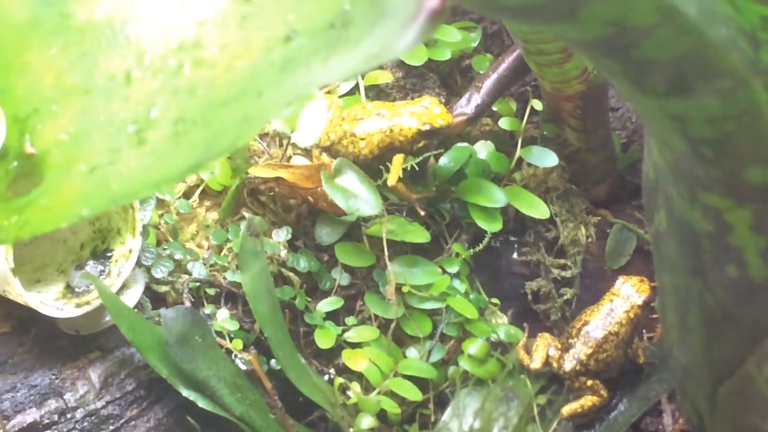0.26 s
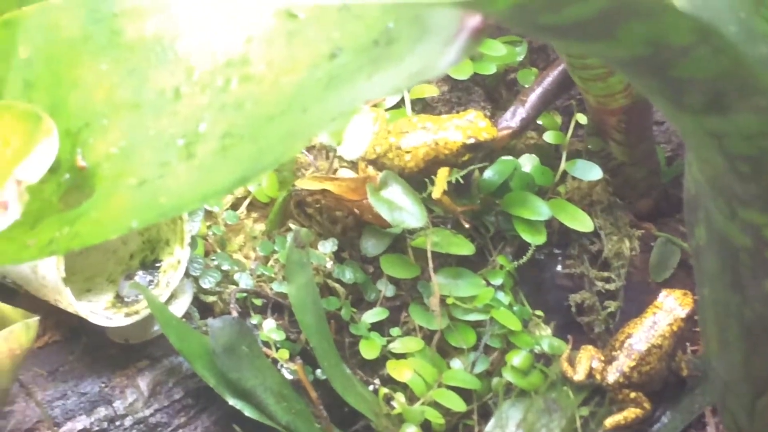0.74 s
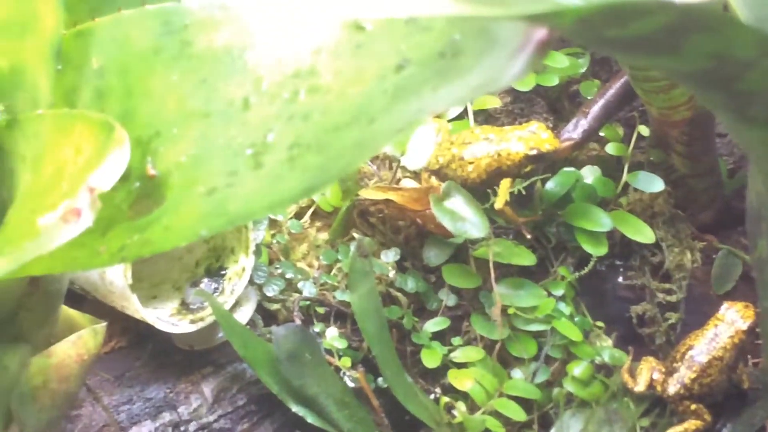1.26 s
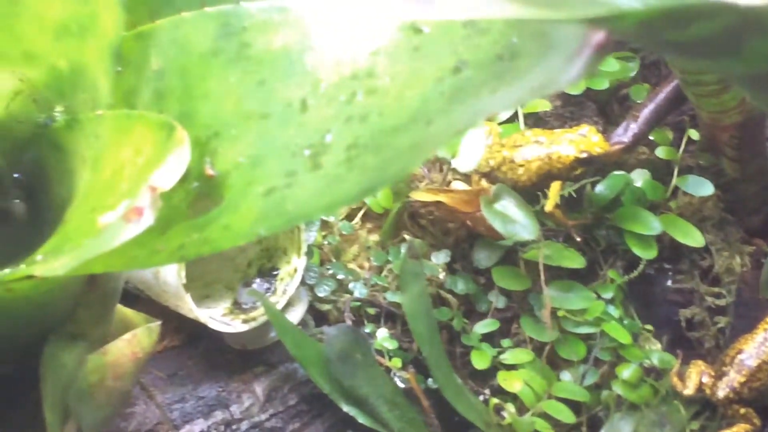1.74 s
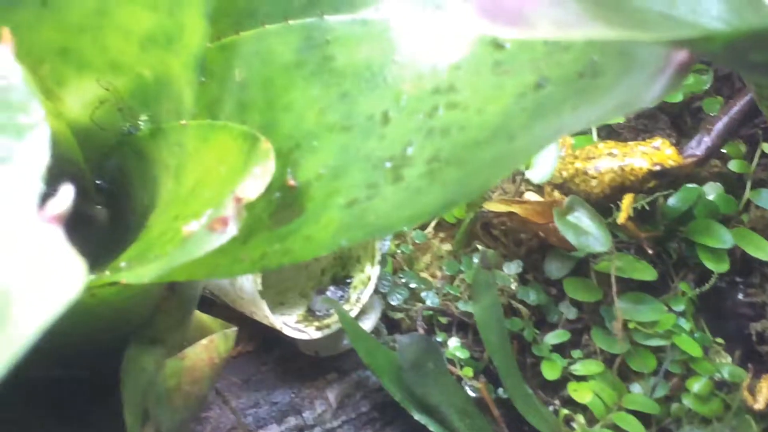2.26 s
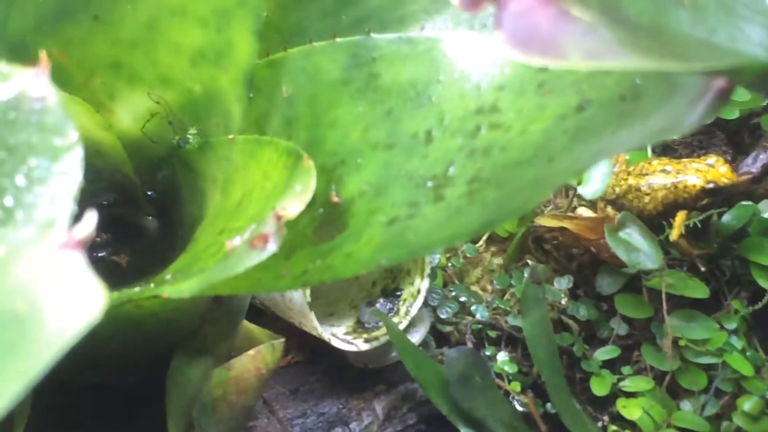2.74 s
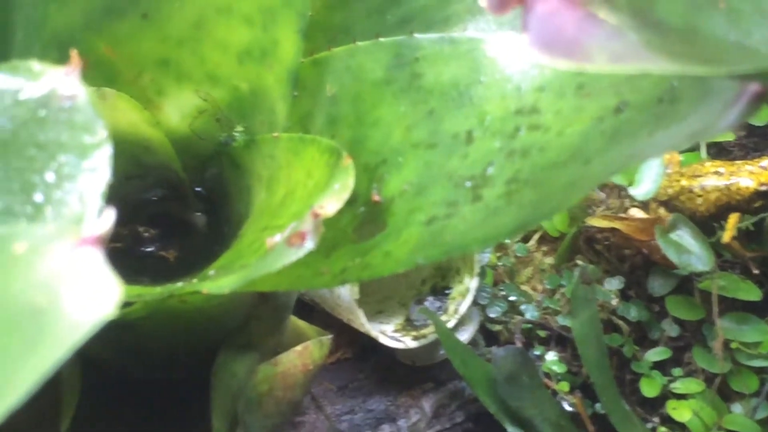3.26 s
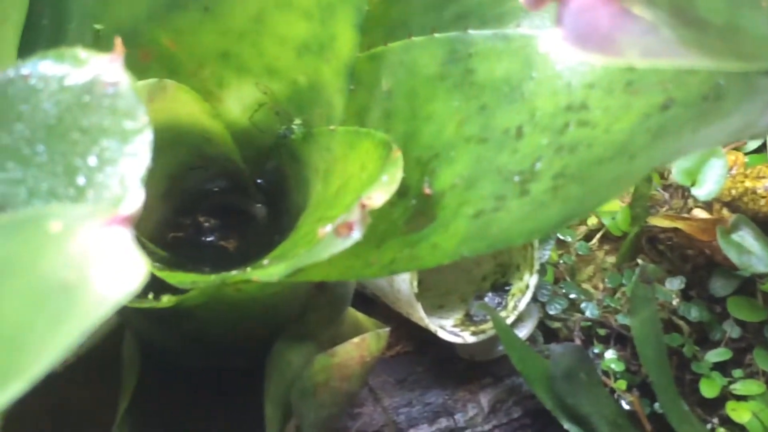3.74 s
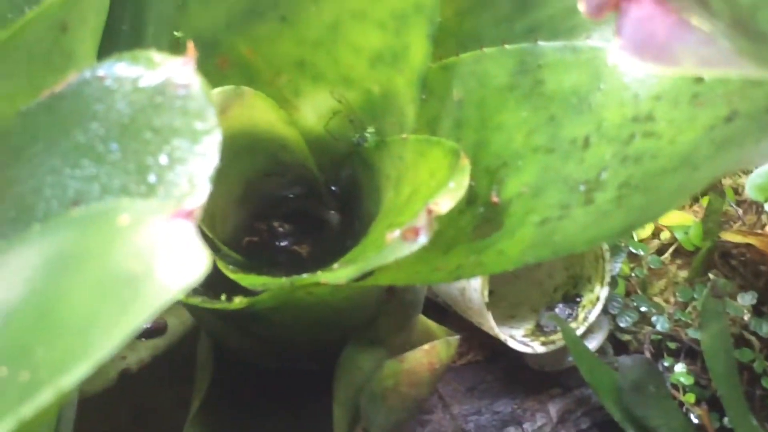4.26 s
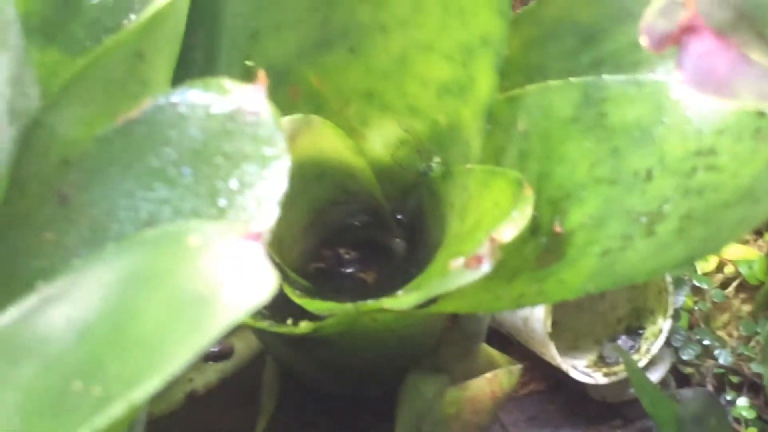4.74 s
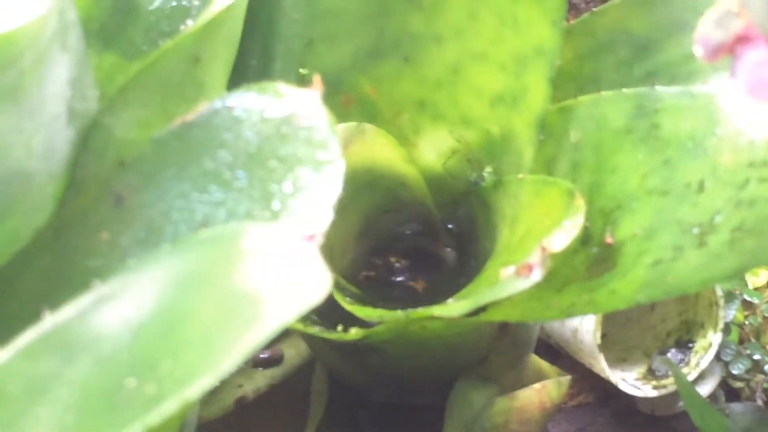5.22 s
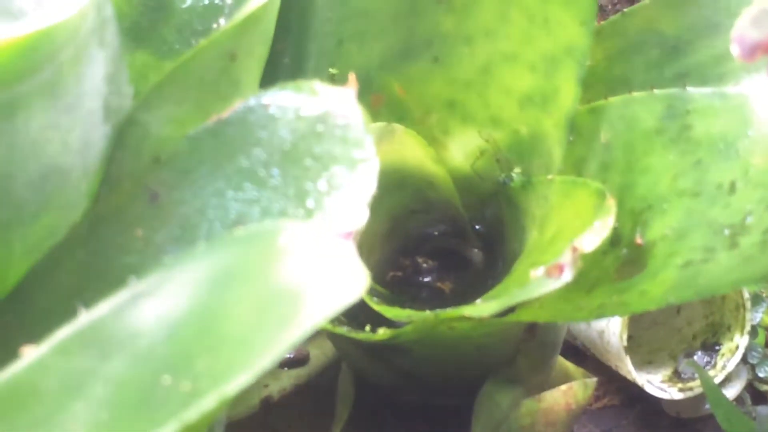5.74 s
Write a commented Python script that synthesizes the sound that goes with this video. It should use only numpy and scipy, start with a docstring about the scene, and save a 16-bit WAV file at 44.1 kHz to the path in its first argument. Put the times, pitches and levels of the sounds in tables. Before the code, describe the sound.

One small frog in a planted glass terrarium gives short buzzing chirps without pause, almost six a second. Each is a run of clicks speeding up into a ringing, nasal buzz. Close and clear at first, the call drops after three seconds and grows more diffuse as the microphone moves behind a broad leaf. Quiet air noise, a barely audible fan hum and tiny handling thuds lie underneath.

```python
"""In a glass terrarium a small poison dart frog calls, close to six chirps a second.
Each chirp is a run of clicks that speeds up into a buzz, rings the vocal sac and echoes in the terrarium.
The microphone drifts behind a broad leaf, so the call turns softer and more diffuse.
A faint burst of high noise starts with each chirp. Steady noise stands for the air,
wavering sines for a faint fan, and damped thuds for a hand on the camera."""
import sys
import numpy as np
from scipy import signal
from scipy.fft import rfft, irfft
from scipy.io import wavfile

SR = 44100
rng = np.random.default_rng(int(sys.argv[2]) if len(sys.argv) > 2 else 0)


def put_to_file(sound):
    """Save the sound as 16-bit audio at rate SR, in the file named by the first command-line argument."""
    columns = np.atleast_2d(sound).T  # one column per channel
    safe = np.clip(columns, -1, 1)
    whole_steps = np.round(safe * 32767)
    wavfile.write(sys.argv[1], SR, whole_steps.astype(np.int16))


N = 264159  # length of the scene in samples


def amp(db):
    """Decibels to amplitude gain."""
    return 10 ** (np.asarray(db) / 20)


def unit(x):
    """Scales to rms 1."""
    return x / np.sqrt(np.mean(x ** 2) + 1e-20)


def ramp(x, start, end):
    """Goes from 0 at start to 1 at end and holds there."""
    return np.clip((x - start) / max(end - start, 1e-6), 0, 1)


def glide(start, end, share):
    """Moves from start to end as share goes from 0 to 1."""
    return start + (end - start) * share


def read(points, hz):
    """Reads a table of (Hz, value) on a log-frequency axis."""
    f, value = np.transpose(points)
    return np.interp(np.log(hz + 1), np.log(f + 1), value)


def add(mix, start_s, sound):
    """Mixes a sound in at its start time; what lies outside the scene is dropped."""
    at = round(start_s * SR)
    sound = sound[max(-at, 0):]
    part = mix[max(at, 0):][:len(sound)]
    part += sound[:len(part)]


def wander(n, rate_hz):
    """Normally distributed random values, rate_hz of them a second, joined by straight lines."""
    knots = rng.standard_normal(n)
    return np.interp(np.arange(n) * rate_hz / SR, np.arange(n), knots)


def causal(db):
    """Minimum-phase impulse response: it has the given gain per bin and rings only forwards in time."""
    log_gain = np.log(amp(np.r_[db, db[-2:0:-1]]))
    return np.fft.ifft(np.exp(np.conj(signal.hilbert(log_gain)))).real


def resonate(x, hz, width_hz):
    """A resonance of gain 1 that follows the curve hz: shift down to 0 Hz, smooth, shift back up."""
    turn = np.exp(2j * np.pi * np.cumsum(hz * np.ones(len(x))) / SR)
    r = np.exp(-np.pi * width_hz / SR)
    return 2 * (turn * signal.lfilter([1 - r], [1, -r], x / turn)).real


def resonate_twice(x, hz, widths_hz):
    """Two resonances in a row at one pitch, which fall off more steeply on both sides."""
    return resonate(resonate(x, hz, widths_hz[0]), hz, widths_hz[1])


def larynx(length_s, shade_db, dull_db, chance):
    """Clicks of the vocal folds speed up and swell; the sac rings higher, then the voice breaks and stops."""
    # stages in shares of the chirp: the sac is full, the voice breaks upwards, air is cut off, silence
    full_at, break_at, cut_at, silent_at = .7, .86, 1.01, 1.07
    t = np.arange(int(length_s * silent_at * SR)) / SR
    share = t / length_s
    fill = ramp(share, 0, full_at)
    broken = ramp(share, break_at, cut_at)
    unsteady, waver, hiss, straying = chance[:, :len(t)]

    # click rate before its random drift: slow start, held while the sac is full, higher in the break
    start_hz, held_hz, broken_hz, rise_bend = 141.46, 483.87, 596.1, 1.35
    rate = glide(start_hz, held_hz, fill ** rise_bend) + (broken_hz - held_hz) * broken
    # each chirp has its own pitch; the held part is steady, the slow start and the final break stray
    detune, jitter, stray = 0.016045, 0.022, 0.0458  # shares of the click rate
    loose = 1 - fill ** 2 + broken
    hz = rate * (1 + detune * unsteady[0] + jitter * unsteady + stray * loose * straying)

    # one sharp click at every whole turn; the square root keeps the power even at any rate
    first_s = 0.001806
    turns = np.cumsum(hz) / SR
    turns -= np.interp(first_s, t, turns)
    clicks = np.sinc((turns - np.round(turns)) * SR / hz) * np.sqrt(SR / hz)

    # faster clicks are louder, 6 dB an octave; the cut takes the level down
    effort_db = 6 * np.log2(rate / held_hz) - 11.5 * ramp(share, cut_at, silent_at)
    waver_db = 1.5 * waver
    # at first the slack folds leak air and click only softly
    leak_s, leak_db, hiss_db, soft_start = 0.0038, -7, -30, 0.61
    slack = t / leak_s * np.exp(1 - t / leak_s)
    breath = (amp(hiss_db) + amp(leak_db) * slack) * hiss
    flow = (clicks * (1 - soft_start * slack) + breath) * amp(effort_db + waver_db)

    # the folds snap shut with one hard click and a bright tick, at a slightly different moment each time
    shut_share, snap_db, tick_db, snap_spread_db = .95, 15, 25, 5.5
    shut = np.zeros(len(t))
    shut_at = int((shut_share + .02 * straying[0]) * length_s * SR)
    shut[min(shut_at, len(t) - 3)] = amp(snap_spread_db * waver[0])
    flow = flow + amp(snap_db) * shut
    tick = amp(tick_db) * np.convolve(shut, [-.5, 1, -.5], "same")

    # the sac's ring: faint while slack, strongest when taut just before the break, spoilt after it
    slack_db, taut_db, spoilt_db = -16, 9.5, -9
    ring_db = glide(slack_db, taut_db, ramp(share, 0, break_at)) + (spoilt_db - taut_db) * broken ** 2
    ring_hz = np.interp(share, [.3, .95], [2650, 3150])
    ring = resonate(flow, ring_hz, width_hz=324) * amp(ring_db + shade_db)

    # the shrill overtone swells late in the chirp, sinks in pitch and fades a little in the break
    faint_db, shrill_db, shrill_fade_db = -8.5, 18.5, -3
    over_db = glide(faint_db, shrill_db, ramp(share, 0.64, 0.83)) + shrill_fade_db * broken ** 2
    over_hz = np.interp(share, [.65, 1], [7100, 6200])
    overtone = resonate_twice(flow, over_hz, (1050, 1190)) * amp(over_db + dull_db)

    # the first clicks rasp while the sac is still slack
    rasp_db, rasp_s = 13, 0.0037
    rasp = resonate_twice(flow, 4000, (870, 870)) * amp(rasp_db) * np.exp(-t / rasp_s)
    # the last clicks sound hollow in the full sac
    hollow_off_db, hollow_on_db = -19, 7
    hollow = resonate_twice(flow, 1240, (380, 380)) * amp(glide(hollow_off_db, hollow_on_db, broken))
    return flow + tick + ring + overtone + rasp + hollow


def call_colour(hidden, size=4096):
    """The sac's broad resonance, with narrow resonances that colour the call and change behind the leaf."""
    # Throat and slack sac. Each row: frequency in Hz, gain in dB.
    sac_gain = [(200, -35.5), (520, -34), (800, -32), (1150, -20), (1550, -12), (2300, -3.5), (3100, -2),
                (3450, -17), (4300, -21), (5100, -26), (6400, -33.5), (7700, -35.5), (9000, -62),
                (13000, -49.5)]
    # Narrow resonances and dips that colour the call. Each row: frequency in Hz, width in Hz,
    # gain in dB in open view, gain in dB behind the leaf.
    resonances = [(1207, 55, 5, 4.5), (1407.5, 67, 9.5, 11.5), (1658, 190, 11.5, 15),
                  (1804, 60, -18.5, -13.5), (1910, 357, 9, 4), (2059, 75, 4.5, 8), (2304, 137, 3.5, -14),
                  (2381, 130, 6.5, 7), (2551.6, 19, -26, -24.5), (2856.9, 346, 7.5, -3),
                  (3155, 69, -20.5, 9), (3376, 97, -11.5, -0.5), (3710.9, 272, 10.5, 0),
                  (4292, 190, 7.5, 5), (4450, 60, -8.5, 0.5), (6257, 163, 8, 9), (6810, 260, 4, 6),
                  (14500, 360, 13.5, 9.5)]
    hz = np.fft.rfftfreq(size, 1 / SR)
    db = read(sac_gain, hz)
    for centre, width, open_db, behind_db in resonances:
        db = db + glide(open_db, behind_db, hidden) / (1 + (2 * (hz - centre) / width) ** 2)
    # the main band trails the treble, which rounds off each click
    lag_s, lag_hz, lag_width_hz = 0.00138, 2200, 1300
    lag = lag_s / (1 + ((hz - lag_hz) / lag_width_hz) ** 4)
    delay = np.exp(-2j * np.pi * np.cumsum(lag) * hz[1])
    return irfft(rfft(causal(db)) * delay)[:size // 2]


def scatter(t60_table, first_s, size=12000):
    """Dense echoes of energy 1 that fade in around first_s, each band dying at its own speed."""
    hz, t, z = signal.stft(rng.standard_normal(size), SR, nperseg=128)
    decay = amp(-60 * t / read(t60_table, hz)[:, None])
    tail = signal.istft(z * decay, SR, nperseg=128)[1][:size]
    tail *= np.clip(np.arange(size) / SR / first_s - .5, 0, 1)
    return tail / np.linalg.norm(tail)


def high_noise(length_s, edge_hz=7000, flicker_db=6.5, fade_s=0.071):
    """Flickering high-passed noise that starts with each chirp and dies away."""
    t = np.arange(int(2 * length_s * SR)) / SR
    high_pass = signal.butter(2, edge_hz, "high", fs=SR, output="sos")
    noise = unit(signal.sosfilt(high_pass, rng.standard_normal(len(t))))
    flicker = amp(flicker_db * wander(len(t), 220))
    return noise * flicker * np.exp(-t / fade_s) * signal.windows.tukey(len(t), .05)


def frog_and_high_noise():
    """Chirps pass the sac and the terrarium, whose echoes shift as the microphone drifts; noise is laid over."""
    # The call. Each row: start in seconds, length in seconds, level in dB (rms over that length).
    chirps = [(-0.0465, 0.065, -31), (0.125, 0.067, -31), (0.2955, 0.065, -29.5), (0.466, 0.066, -30),
              (0.6338, 0.068, -30.5), (0.8086, 0.066, -30.5), (0.9825, 0.065, -30.5),
              (1.1562, 0.061, -30.4), (1.3257, 0.065, -31.5), (1.4964, 0.0669, -30.5),
              (1.667, 0.067, -29.5), (1.839, 0.063, -30.5), (2.0086, 0.068, -31.5), (2.18, 0.068, -30.5),
              (2.3534, 0.066, -30.5), (2.5262, 0.064, -29.6), (2.6998, 0.067, -31), (2.8724, 0.069, -30.5),
              (3.0494, 0.065, -31.5), (3.2244, 0.071, -33.5), (3.402, 0.065, -32), (3.5757, 0.066762, -34),
              (3.75, 0.068, -33.9), (3.924, 0.0661, -33.5), (4.099, 0.067, -33.5), (4.2666, 0.067, -34.5),
              (4.442, 0.066, -35), (4.6166, 0.0602, -36), (4.7849, 0.059, -36.5), (4.9603, 0.061, -36),
              (5.131, 0.056, -37), (5.301, 0.061, -37), (5.4702, 0.068, -36.9), (5.643, 0.062, -36.5),
              (5.8154, 0.06, -37)]
    # How far the leaf hides the frog. Each row: time in seconds, share hidden from 0 to 1.
    leaf_cover = [(0, 0.03), (2.7, 0), (3.6, 0.44), (4.3, 0.56), (4.8, 1), (6, 0.76)]
    # Dying away of the echoes. Each row: frequency in Hz, t60 in the terrarium in seconds,
    # t60 in the room outside in seconds.
    echo_decay = np.array([(500, 0.066, 0.35), (1080, 0.076, 0.18), (1552.2, 0.03, 0.19),
                           (2270, 0.079, 0.27), (3016, 0.069, 0.2), (4200, 0.071, 0.19),
                           (6350, 0.055, 0.31), (12200, 0.1, 0.34)])
    # echo levels in open view and behind the leaf
    open_wet_db, hidden_wet_db, open_room_db, hidden_room_db = -6, 0, -21, -16
    drift = 1.387  # radians a second from one echo pattern towards the other
    noise_db = -40  # relative to the chirp
    out = np.zeros(N)
    here = scatter(echo_decay[:, :2], first_s=0.0018)
    there = scatter(echo_decay[:, :2], first_s=0.0024)
    outside = scatter(echo_decay[:, ::2], first_s=0.0053)
    n = SR // 10  # longer than any chirp
    for start_s, length_s, db in chirps:
        hidden = np.interp(start_s, *np.transpose(leaf_cover))
        echoes = np.cos(drift * start_s) * here + np.sin(drift * start_s) * there
        paths = amp(glide(open_wet_db, hidden_wet_db, hidden)) * echoes
        paths[0] += 1  # the straight path
        # pitch, strength, breath hiss, straying: the same draws serve the near and far paths
        chance = np.array([wander(n, 253.2), wander(n, 136.0), rng.standard_normal(n), wander(n, 110.5)])
        body = call_colour(hidden)
        # the leaf shades the sac's ring and overtone on the near paths
        near = signal.fftconvolve(larynx(length_s, -5 * hidden, -3 * hidden, chance), body)
        # the way round through the room leaves the ring alone and always dulls the overtone alike
        far = signal.fftconvolve(larynx(length_s, 0, -4.5, chance), body)
        room_gain = amp(glide(open_room_db, hidden_room_db, hidden))
        heard = signal.fftconvolve(near, paths) + room_gain * signal.fftconvolve(far, outside)
        level = np.sqrt(np.sum(heard ** 2) / (length_s * SR))
        add(out, start_s, amp(db) * heard / level)
        add(out, start_s, amp(db + noise_db) * high_noise(length_s))
    return out


def air_noise(air_db=-66, rumble_hz=220, rumble_sway_db=2):
    """Steady noise of the room and microphone, shaped by a spectrum; its rumble comes and goes."""
    # Colour of the air noise. Each row: frequency in Hz, relative density in dB per Hz.
    air_colour = [(20, -30.5), (32, -10), (55, 2.5), (90, -2), (140, -1.5), (240, -12.5), (450, -13.5),
                  (900, -20.5), (2000, -15.5), (4500, -23.5), (9000, -30.5), (15000, -33)]
    hz = np.fft.rfftfreq(N, 1 / SR)
    shaped = irfft(rfft(rng.standard_normal(N)) * amp(read(air_colour, hz)), N)
    air = amp(air_db) * unit(shaped)
    rumble = signal.sosfiltfilt(signal.butter(2, rumble_hz, fs=SR, output="sos"), air)
    return air + rumble * (amp(rumble_sway_db * wander(N, 29)) - 1)


def fan(hum_sway=0.7):
    """The hum of a fan motor: sines that waver in phase and strength."""
    # Motor tones. Each row: frequency in Hz, rms level in dB before the sway.
    motor_tones = [(58.5, -79.5), (118, -74)]
    t = np.arange(N) / SR
    hum = np.zeros(N)
    for hz, db in motor_tones:
        tone = np.sqrt(2) * np.sin(2 * np.pi * hz * t + 0.8 * wander(N, 16))
        hum += amp(db) * tone * (1 + hum_sway * wander(N, 7.7))
    return hum


def handling(thud_s=0.0025333, edge_hz=330, rub_db=-8):
    """Each bump is a dull, heavily damped thud in the camera body: a sine and low noise, quickly gone."""
    # Soft bumps of the hand on the camera. Each row: start in seconds, level in dB, pitch in Hz.
    bumps = [(0.245, -48, 125), (0.484, -57.5, 221), (0.665, -48, 137.5), (0.779, -51.5, 146.4),
             (1.014, -52, 128.6), (2.797, -48.5, 74.7), (3.034, -55, 110.6), (3.617, -55.5, 172),
             (3.763, -58, 205.1), (4.381, -58, 127), (4.498, -54.5, 79.7), (4.685, -53, 103)]
    out = np.zeros(N)
    t = np.arange(SR // 10) / SR
    envelope = t / thud_s * np.exp(1 - t / thud_s)  # peaks at 1 after thud_s
    low_pass = signal.butter(2, edge_hz, fs=SR, output="sos")
    for start_s, db, hz in bumps:
        rub = unit(signal.sosfilt(low_pass, rng.standard_normal(len(t))))
        thud = np.sin(2 * np.pi * hz * t) + amp(rub_db) * rub
        add(out, start_s, amp(db) * thud * envelope)
    return out


def scene():
    """Frog, high noise, air, fan and hand at one microphone."""
    return (frog_and_high_noise() + air_noise() + fan() + handling())[None]


def record(dry):
    """The recorder's band limit: a steep low-pass."""
    edge_hz = 15400
    low_pass = signal.firwin(511, edge_hz, window=("kaiser", 9), fs=SR)
    return signal.oaconvolve(dry, low_pass[None], "same")


dry = scene()
out = record(dry)
put_to_file(out)
```